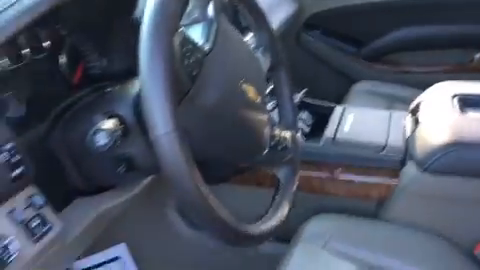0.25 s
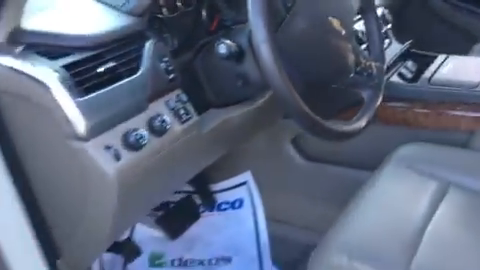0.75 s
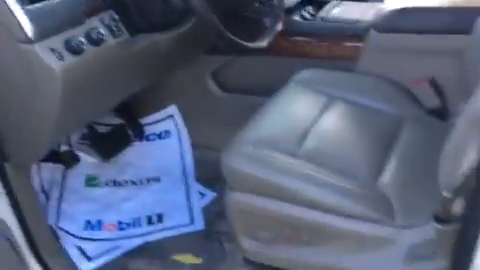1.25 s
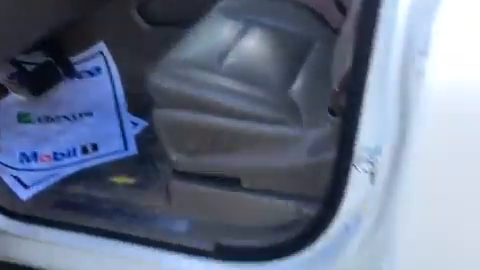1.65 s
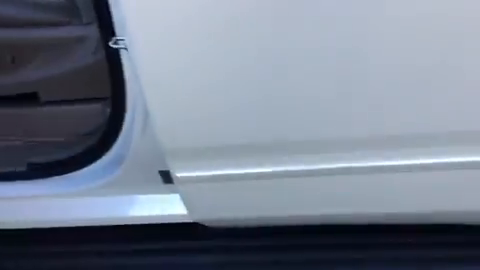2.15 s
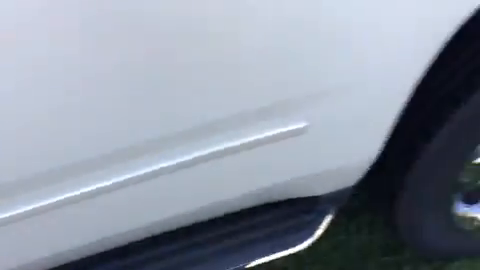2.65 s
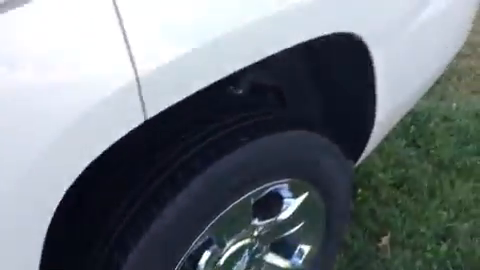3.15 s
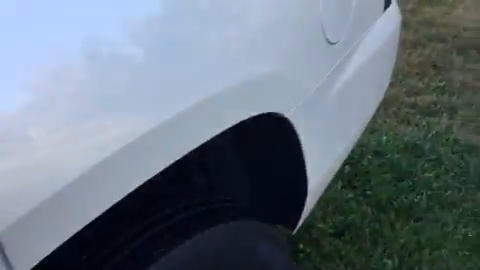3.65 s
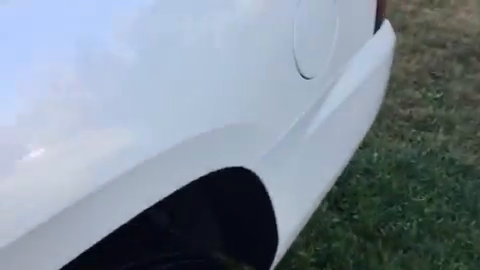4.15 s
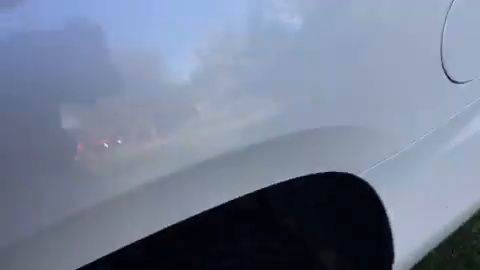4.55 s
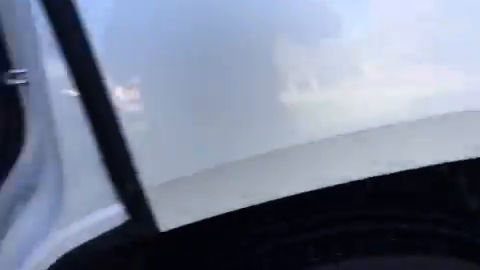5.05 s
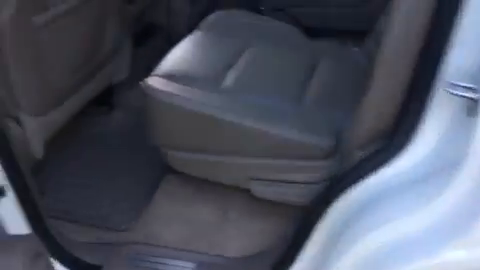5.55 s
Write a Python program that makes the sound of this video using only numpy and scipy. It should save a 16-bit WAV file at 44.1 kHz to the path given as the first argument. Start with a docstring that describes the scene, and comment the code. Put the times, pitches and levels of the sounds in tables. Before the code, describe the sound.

Soft footsteps and rustles of grass and clothing move along a parked car, while a dove coos faintly far off. About halfway through, a heavy door slams shut nearby, the loudest sound. A second door then unlatches with a quieter clunk and opens with a metallic click. A low outdoor rumble, far traffic and barely audible insects continue throughout.

```python
"""A low outdoor rumble and distant traffic, with trilling insects, a cooing dove and a small bird far off.
Someone walks on grass along a large parked car, rustling with each stride, and slams its front door:
the seal slaps, the latch cracks, and the impacts excite the modes of shell, trim and cabin air.
Then the rear door's handle is pulled, its latch lets go with a thud and the stay clicks as it swings open.
"""
import sys
import numpy as np
from scipy import signal
from scipy.fft import rfft, irfft, next_fast_len
from scipy.io import wavfile

SR = 44100
rng = np.random.default_rng(int(sys.argv[2]) if len(sys.argv) > 2 else 0)


def materialize(psi):
    """Save the field psi as 16-bit PCM at rate SR to the path in sys.argv[1].

    A 1-D psi becomes a single channel; in a 2-D psi each row is a channel.
    """
    bounded = np.clip(np.atleast_2d(psi).T, -1, 1)
    quanta = np.round(bounded * 32767).astype(np.int16)
    wavfile.write(sys.argv[1], SR, quanta)


N = 256220
TIME = np.arange(N) / SR

# Noise spectra: frequency_hz, density_db (relative)
RUMBLE_SPECTRUM = [(20, -33), (35, -10.5), (58, 3), (85, -3), (140, -6), (200, -12.5), (320, -19),
                   (500, -43), (1000, -75)]
TRAFFIC_FRONT_SPECTRUM = [(150, -4), (370, 1.5), (500, -1.5), (800, -2), (1100, -3.5), (1500, -9.5),
                          (2100, -11), (2900, -19.5), (4200, -20), (5600, -19), (7500, -28), (10500, -34.5)]
TRAFFIC_REAR_SPECTRUM = [(150, -4), (330, -6.5), (550, -4), (760, -3.5), (950, -1), (1400, -0.5),
                         (2100, -7), (2900, -14.5), (4200, -20.5), (5600, -24.5), (7500, -31), (10500, -45)]
GRASS_SPECTRUM = [(300, -19), (1500, -0.5), (2200, 2), (3500, -1), (6000, -1), (9300, 0.5), (10500, -9.5)]
HEEL_SPECTRUM = [(25, -10), (60, 1.5), (90, -6), (150, -17), (400, -48), (1000, -70)]  # heel on soft ground
TAP_SPECTRUM = [(100, -3), (330, 8), (700, -9), (2000, -52)]  # tap of the sole
SLIDE_SPECTRUM = [(200, 1), (600, 3.5), (1400, 1.5), (2400, 5), (4000, -6), (7000, -14), (11000, -34)]  # door rubbing on seal and hinge
SCRAPE_SPECTRUM = [(300, 11.5), (1300, 3.5), (3400, 3), (5600, -4), (7500, -5), (11000, -20)]  # steel scraping within each click
SLAP_SPECTRUM = [(100, -7), (300, 16), (600, -4.5), (1300, -12), (2500, -5), (3800, -20), (5500, -35),
                 (10000, -42)]  # rubber seal on the frame
PANEL_SPECTRUM = [(60, -13), (150, 5.5), (350, 9), (650, -12), (920, -3.5), (1350, -13), (1800, -8.5),
                  (2500, -8.5), (3100, -14), (4200, -15.5), (6000, -22), (10000, -33.5)]  # dense ring of panels and trim
LATCH_SPECTRUM = [(100, -13), (350, 8.5), (950, 6), (1400, -10), (1800, -5.5), (3500, -13), (5000, -8.5),
                  (8500, -3), (10500, -19.5)]  # steel latch on its striker

# Decay times of the noise bursts: frequency_hz, t60_s
HEEL_DECAY = [(70, 0.47), (200, 0.13)]
TAP_DECAY = [(100, 0.088), (1000, 0.044)]
SCUFF_DECAY = [(1000, 0.092), (8000, 0.045)]
SCRAPE_DECAY = [(1000, 0.092), (8000, 0.048)]
SLAP_DECAY = [(200, 0.14), (4000, 0.078)]
PANEL_DECAY = [(60, 0.72), (200, 0.42), (500, 0.15), (1000, 0.21), (2300, 0.19), (5000, 0.12), (10000, .18)]
LATCH_DECAY = [(400, 0.03), (8000, 0.016)]

# Normal modes: frequency_hz, level_db, t60_s
THUD_MODES = [(57.6, -13, 0.52), (136, 2, 0.1), (175, -6, 0.062), (238, -17, 0.038)]  # rear door, low range
KNOCK_MODES = [(296, -8, 0.085), (360, -0.5, 0.041), (526, -4.5, 0.05), (587, -10.5, 0.044),
               (800, -16, 0.046), (974, -18.5, 0.054), (1340, -22, .03)]  # rear door, middle range
STAY_MODES = [(626, -13, 0.12), (1400, -10, 0.031), (2740, -7.5, 0.024), (3370, 2, 0.017),
              (3700, -9.5, .017), (4300, -9, .022), (5230, -5, 0.018), (5670, -11, 0.024)]  # steel door stay
SHELL_MODES = [(120, -32, 0.13), (146, -1.5, .115), (175, -5.5, 0.093), (199, -17.5, 0.35),
               (234, -14, 0.16), (286, -21, 0.19), (320, -30, 0.077), (341.5, -19, 0.17), (387, -22, 0.18),
               (410, -24, 0.1), (445, -19.5, 0.12), (543, -24, 0.18), (590, -21.5, 0.19), (657, -22, 0.14),
               (737, -16.5, 0.083), (876, -20, 0.093), (994, -23, 0.078), (1003, -29, 0.14),
               (1108, -27, 0.072), (1847, -23, 0.1), (2120, -43, 0.15), (2400, -42, 0.14),
               (2504, -30, 0.28)]  # front door shell
CABIN_MODES = [(54.5, -6.5, 0.49), (92.8, -14, 0.44)]  # air and roof of the closed cabin

# Far traffic, louder once the car no longer shields it: time_s, level_db
TRAFFIC_LEVEL = [(0, -52.5), (1.0, -51), (2.7, -50.5), (3.75, -46.5), (5.81, -47)]
# How far the view past the rear of the car has opened: time_s, open_share
OPENNESS = [(0, 0), (1.2, 0.15), (3.5, 0.51), (5.0, 0.75)]
# Insects in the grass: pitch_hz, width_hz, level_db
INSECT_BANDS = [(5380, 100, -77), (5770, 110, -78), (6470, 100, -80)]
# Three high whistles and three low coos: start_s, length_s, from_hz, to_hz, level_db
BIRD_NOTES = [(.07, 0.088, 3550, 3565, -68.5), (0.127, 0.19, 3530, 3385, -69), (.32, 0.17, 3465, 3440, -71),
              (0.313, 0.35, 624, 618, -50), (0.888, 0.25, 619, 624, -55.5), (1.344, 0.27, 623, 622, -55)]
# Grass and clothes brush with each stride or reach: start_s, hold_s, level_db
STRIDES = [(.04, 0.062, -65), (.30, 0.097, -67.5), (.74, 0.13, -62), (.95, 0.17, -63), (1.41, .24, -60),
           (1.70, 0.21, -66), (1.95, 0.091, -59), (3.13, 0.26, -55), (3.54, 0.2, -61), (3.88, 0.062, -62.5),
           (4.12, 0.092, -56), (4.34, 0.12, -62), (4.72, 0.23, -59)]
# Shoes meet the ground: start_s, heel_db, tap_db, scuff_db
FOOTFALLS = [(.975, -41, -56, -66), (.995, -52, -52, -56), (2.247, -60, -62, -57), (2.258, -60, -58, -50),
             (2.265, -52, -39.5, -51.5), (2.9, -56, -37, -77), (2.924, -38, -48, -76),
             (3.661, -32, -73, -76), (4.438, -32, -51, -70), (4.86, -34, -43, -72),
             (4.935, -35.5, -48, -64), (5.425, -48, -60, -59)]
# The plastic handle meets its stops: start_s, level_db, pitch_hz
HANDLE_STOPS = [(4.1055, -25, 1900), (4.1340, -31.5, 1400), (4.199, -30.5, 2220), (4.2076, -23.5, 2210),
                (4.2090, -29, 2610)]
# Contacts of the rear latch and stay: start_s, thud_db, knock_db, steel_db, scrape_db
REAR_CONTACTS = [(4.0938, -37, -40, -67, -62), (4.1037, -30, -38, -60, -48), (4.135, -48, -35, -54, -40),
                 (4.1393, -50, -50, -45, -37), (4.1880, -44, -26.5, -65, -51), (4.1909, -15, -45, -64, -57),
                 (4.2024, -31, -25, -55, -47), (4.2072, -22.5, -34, -48, -30.5),
                 (4.237, -34, -39, -53, -48), (4.2713, -34, -25.5, -60, -62),
                 (4.2892, -44, -36.5, -57, -56), (4.6617, -58, -62, -49, -37.5),
                 (4.6842, -51, -42, -35, -32.5), (4.6859, -54, -48, -24.5, -47),
                 (4.6899, -40, -48, -34, -35)]
# The rear door slides off its seal, then on its hinge: start_s, hold_s, level_db
REAR_SLIDES = [(4.08, 0.35, -47.5), (4.66, 0.098, -59)]
# Contacts of the slammed door: start_s, push_db, slap_db, clatter_db, crack_db
SLAM_CONTACTS = [(3.2856, -32, -34, -55, -60), (3.2923, -25, -16.5, -45, -52), (3.3003, -39, -23, -33, -19),
                 (3.3021, -43, -26, -14.5, -6), (3.3038, 0, -28, -17, -16), (3.309, -28, -30, -18.5, -26),
                 (3.333, -19, -32, -19.5, -33), (3.372, -21.5, -29, -30.5, -41),
                 (3.3895, -19, -30, -42, -47)]
# Hollows in the microphone's response: centre_hz, width_hz, depth_db
MIC_DIPS = [(2870, 220, -2.5), (7760, 1400, -3)]


def from_db(db):
    """Amplitude grows tenfold for every 20 dB."""
    return 10 ** (np.asarray(db) / 20)


def unit_power(x):
    """Dividing a signal by its RMS value gives it unit power."""
    return x / np.sqrt(np.mean(x ** 2) + 1e-20)


def at_hz(table, hz):
    """Interpolation on a logarithmic frequency axis."""
    table_hz, values = np.transpose(table)
    return np.interp(np.log(hz), np.log(table_hz), values)


def drift(corner_hz):
    """Low-passed noise is a slow random fluctuation, here of unit spread."""
    hop, settling = 40, 2000
    pole = np.exp(-2 * np.pi * corner_hz * hop / SR)
    white = rng.standard_normal(N // hop + settling + 2)
    slow = signal.lfilter([1], [1, -2 * pole, pole * pole], white)[settling:]
    return np.interp(np.arange(N) / hop, np.arange(len(slow)), unit_power(slow))


def coloured_noise(spectrum, size):
    """Spectral weighting colours white noise; the result has unit power."""
    padded = next_fast_len(size)
    hz = np.fft.rfftfreq(padded, 1 / SR)
    gain = from_db(at_hz(spectrum, np.maximum(hz, 1))) * (hz > 20) * (hz < SR / 4)
    white = rfft(rng.standard_normal(padded))
    return unit_power(irfft(white * gain, padded)[:size])


def wavering_noise(spectrum, waver_db):
    """Slow amplitude modulation makes a steady noise waver."""
    return unit_power(coloured_noise(spectrum, N) * from_db(waver_db * drift(9.7)))


def swells(rows, attack_s, release_s):
    """Envelope of rubbing movements that rise, hold and decay; incoherent sources add in power."""
    power = np.zeros(N)
    for start, hold, level_db in rows:
        rise = np.clip((TIME - start) / attack_s + .5, 0, 1)
        fall = np.exp(-np.maximum(TIME - start - hold, 0) / release_s)
        power += (from_db(level_db) * rise * fall) ** 2
    return np.sqrt(power)


def bursts(start_s, levels_db, spectrum, decay):
    """Modal overlap: a blow excites countless close modes, heard as noise decaying octave by octave."""
    onsets = np.round(np.array(start_s) * SR).astype(int)
    first = onsets.min()
    size = next_fast_len(onsets.max() - first + SR // 2)
    blows = np.zeros(size)
    blows[onsets - first] = from_db(levels_db) ** 2
    noise, hz = rfft(coloured_noise(spectrum, size)), np.fft.rfftfreq(size, 1 / SR)
    octaves_hz = 70 * 2. ** np.arange(8)
    out = np.zeros(N + size)
    for centre in octaves_hz:
        band = irfft(noise * np.interp(hz, octaves_hz, octaves_hz == centre), size)
        retained = np.exp(-2 * np.log(1000) / (at_hz(decay, centre) * SR))
        energy = signal.lfilter([1], [1, -retained], blows + 1e-18)
        out[first:first + size] += band * np.sqrt(energy)
    return out[:N]


def struck(start_s, levels_db, modes, spread_db):
    """Modal superposition: each blow rings every mode as a damped sinusoid of scattered strength."""
    out, onsets = np.zeros(N), np.round(np.array(start_s) * SR).astype(int)
    for hz, mode_db, t60 in modes:
        scatter_db = spread_db * rng.standard_normal(len(onsets))
        blows = np.zeros(N)
        blows[onsets] = from_db(np.array(levels_db) + mode_db + scatter_db)
        radius, angle = np.exp(-np.log(1000) / (t60 * SR)), 2 * np.pi * hz / SR
        out += signal.lfilter([0, np.sin(angle)], [1, -2 * radius * np.cos(angle), radius ** 2], blows + 1e-18)
    return out


def softened(x, corner_hz):
    """A compliant contact acts as a low-pass filter."""
    return signal.sosfilt(signal.butter(2, corner_hz, fs=SR, output="sos"), x + 1e-18)


def rumble_and_traffic():
    """Acoustic shadow: over a low rumble, far tyre noise grows as the car ceases to shield it."""
    traffic_db = np.interp(TIME, *np.transpose(TRAFFIC_LEVEL))
    openness = np.interp(TIME, *np.transpose(OPENNESS))
    front = np.sqrt(1 - openness) * wavering_noise(TRAFFIC_FRONT_SPECTRUM, waver_db=0.7)
    rear = np.sqrt(openness) * wavering_noise(TRAFFIC_REAR_SPECTRUM, waver_db=1.3)
    rumble = from_db(-44) * wavering_noise(RUMBLE_SPECTRUM, waver_db=1.04)
    return rumble + from_db(traffic_db) * (front + rear)


def insects():
    """Thin steady trills, blurred by distance into narrow-band noise."""
    out = np.zeros(N)
    for hz, width_hz, level_db in INSECT_BANDS:
        resonance = signal.iirpeak(hz, hz / width_hz, fs=SR)
        out += from_db(level_db) * unit_power(signal.lfilter(*resonance, rng.standard_normal(N)))
    return out


def birds():
    """Nearly pure gliding tones, modulated in pitch and level on their long path."""
    out, waver = np.zeros(N), 1 + 0.0037 * drift(7.2)
    for start, length, from_hz, to_hz, level_db in BIRD_NOTES:
        progress = np.clip((TIME - start) / length, 0, 1)
        hz = (from_hz + (to_hz - from_hz) * progress) * waver
        envelope = from_db(level_db) * np.sqrt(np.abs(np.sin(np.pi * progress)))
        out += envelope * np.sin(2 * np.pi * np.cumsum(hz) / SR)
    return out * from_db(drift(12))


def walker():
    """Friction of grass and clothes gives grainy noise; soft ground cushions the impact of each step."""
    between_strides_db, grain_db = -72.5, 2
    brushing = np.hypot(from_db(between_strides_db), swells(STRIDES, attack_s=.11, release_s=0.084))
    blades = wavering_noise(GRASS_SPECTRUM, waver_db=0.7) * from_db(grain_db * drift(150))
    start_s, heel_db, tap_db, scuff_db = np.transpose(FOOTFALLS)
    heels = softened(bursts(start_s, heel_db, HEEL_SPECTRUM, HEEL_DECAY), corner_hz=220)
    taps = softened(bursts(start_s, tap_db, TAP_SPECTRUM, TAP_DECAY), corner_hz=900)
    scuffs = bursts(start_s, scuff_db, GRASS_SPECTRUM, SCUFF_DECAY)
    return brushing * unit_power(blades) + heels + taps + scuffs


def rear_door():
    """Impacts of handle, latch and stay set off free vibration; seal and hinge add friction noise."""
    start_s, thud_db, knock_db, steel_db, scrape_db = np.transpose(REAR_CONTACTS)
    handle_t60_s = 0.012
    handle = sum(struck([when], [level_db], [(hz, 0, handle_t60_s)], spread_db=0.5)
                 for when, level_db, hz in HANDLE_STOPS)
    thud = struck(start_s, thud_db, THUD_MODES, spread_db=1.7)
    knock = struck(start_s, knock_db, KNOCK_MODES, spread_db=3.5)
    stay = struck(start_s, steel_db, STAY_MODES, spread_db=1.2)
    scrape = bursts(start_s, scrape_db, SCRAPE_SPECTRUM, SCRAPE_DECAY)
    rubbing = swells(REAR_SLIDES, attack_s=0.2, release_s=0.068) * from_db(1.7 * drift(70))
    sliding = rubbing * wavering_noise(SLIDE_SPECTRUM, waver_db=1.5)
    return handle + stay + scrape + sliding - thud - knock


def front_door_slam():
    """Impulse excitation: seal contact, two latch catches and the rebound ring shell, trim and cabin."""
    start_s, push_db, slap_db, clatter_db, crack_db = np.transpose(SLAM_CONTACTS)
    cabin_lag_s = 0.0116  # the cabin answers once the door has sunk into its seal
    shell = struck(start_s, push_db, SHELL_MODES, spread_db=2.0)
    boom = struck(start_s + cabin_lag_s, push_db, CABIN_MODES, spread_db=0.0)
    seal = bursts(start_s, slap_db, SLAP_SPECTRUM, SLAP_DECAY)
    panels = bursts(start_s, clatter_db, PANEL_SPECTRUM, PANEL_DECAY)
    latch = bursts(start_s, crack_db, LATCH_SPECTRUM, LATCH_DECAY)
    # the skin moves inwards first, so the pressure outside starts with a dip
    return seal + panels + latch - shell - boom


def scene():
    """Superposition: the pressures of all sources add at one point."""
    return (front_door_slam() + rear_door() + walker() + rumble_and_traffic() + birds() + insects())[None]


def gain_control(x):
    """Compression: a peak above the threshold turns the gain down, and it recovers at a steady rate."""
    threshold_db, slope, attack_s, recovery_db_per_s = -9, 0.33, 0.086, 13.5
    cut_db = slope * np.maximum(20 * np.log10(np.abs(x) + 1e-9) - threshold_db, 0)
    recovery_db = recovery_db_per_s * TIME
    held_db = np.maximum.accumulate(cut_db + recovery_db, axis=-1) - recovery_db
    pole = np.exp(-1 / (attack_s * SR))
    return x * from_db(-signal.lfilter([1 - pole], [1, -pole], held_db))


def record(dry):
    """Microphone notches colour the treble; compression, soft saturation and a low-pass follow."""
    ceiling, cutoff_hz = .85, 10400
    for hz, width_hz, depth_db in MIC_DIPS:
        band = signal.lfilter(*signal.iirpeak(hz, hz / width_hz, fs=SR), dry)
        dry = dry - (1 - from_db(depth_db)) * band
    ducked = gain_control(dry)
    rounded = ducked / (1 + (ducked / ceiling) ** 6) ** (1 / 6)
    return signal.sosfilt(signal.ellip(10, .2, 80, cutoff_hz, fs=SR, output="sos"), rounded)


dry = scene()
out = record(dry)
materialize(out)
```